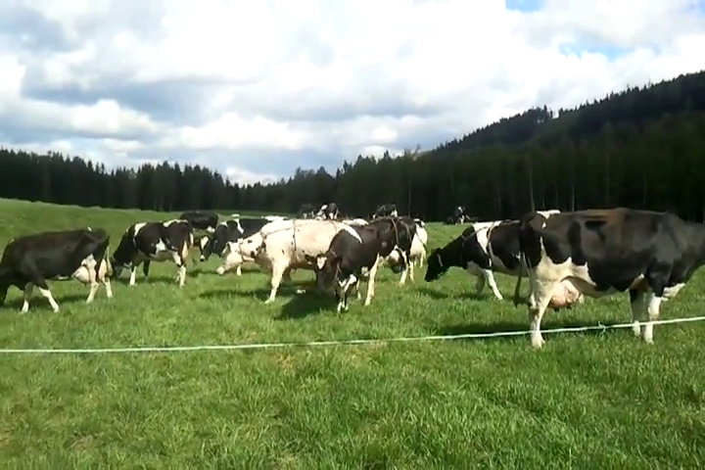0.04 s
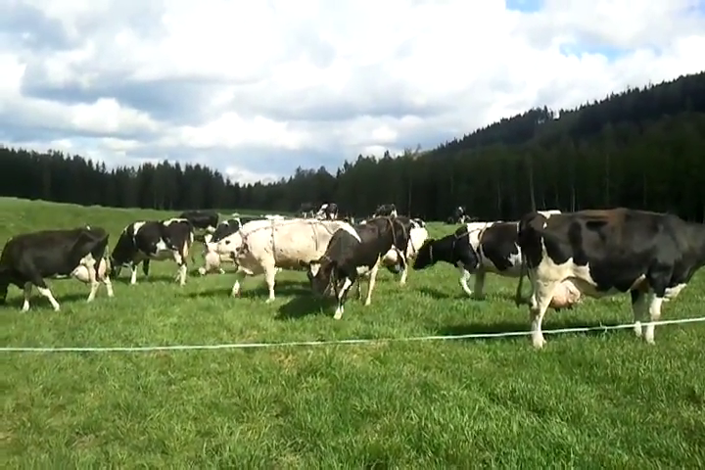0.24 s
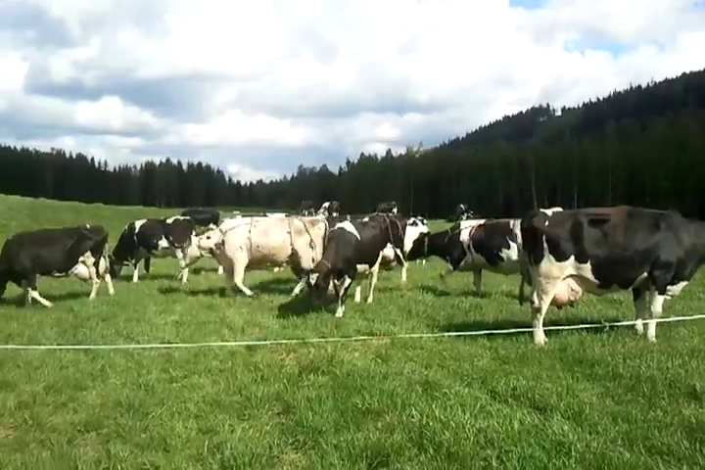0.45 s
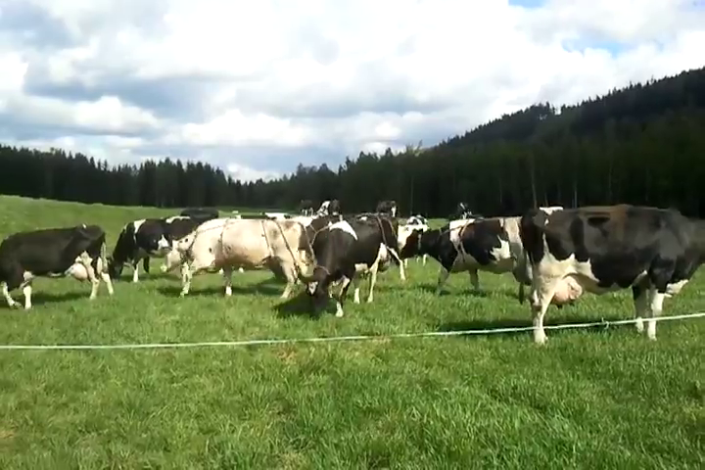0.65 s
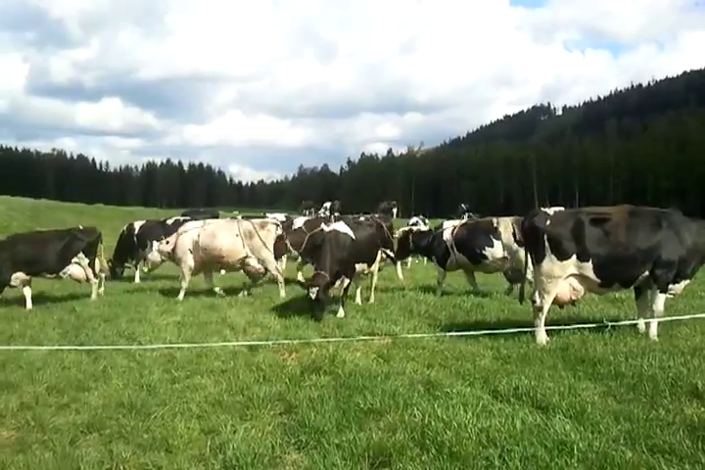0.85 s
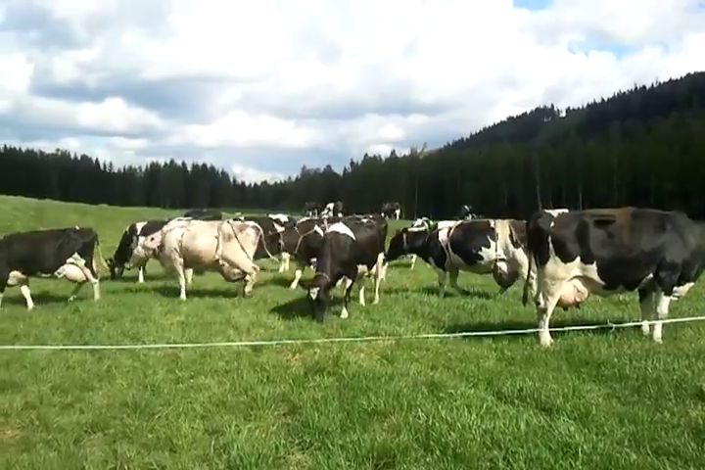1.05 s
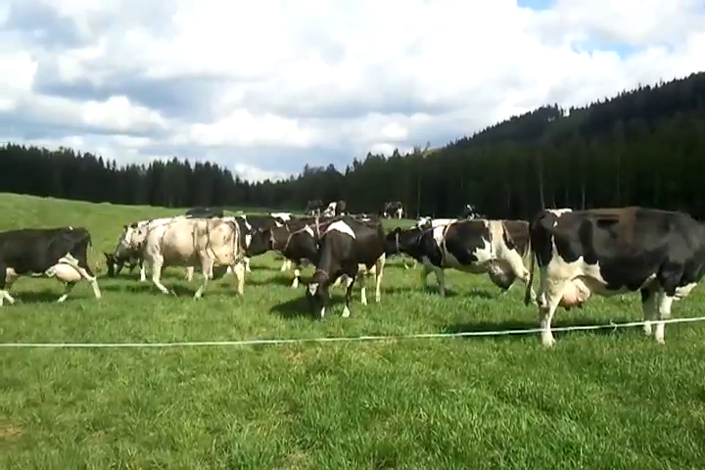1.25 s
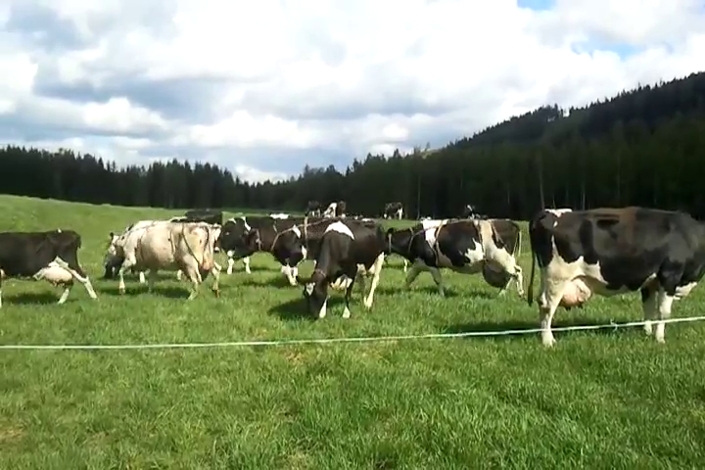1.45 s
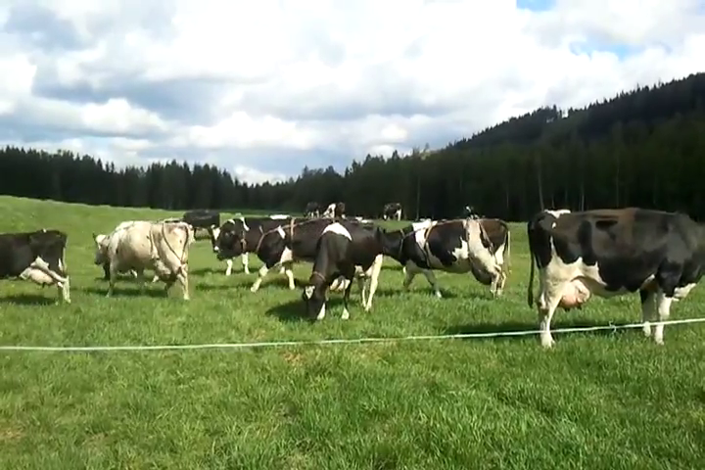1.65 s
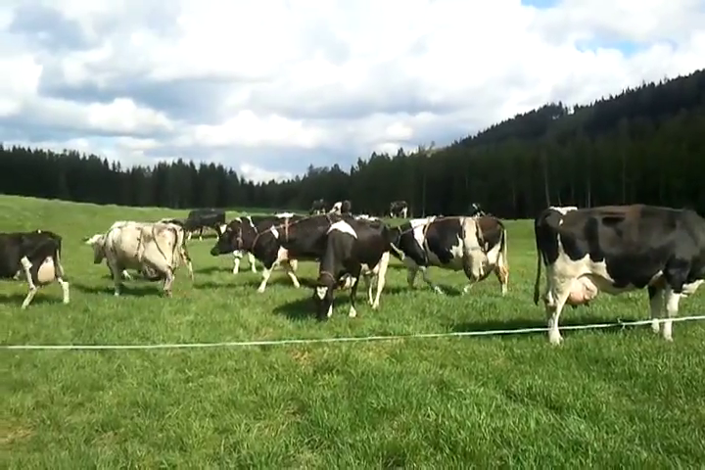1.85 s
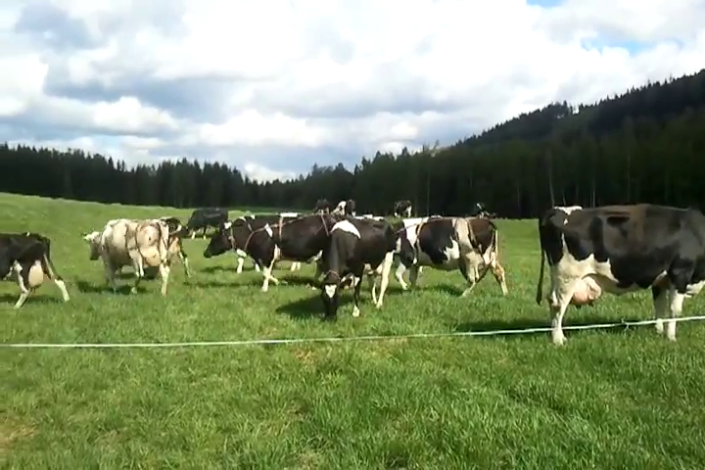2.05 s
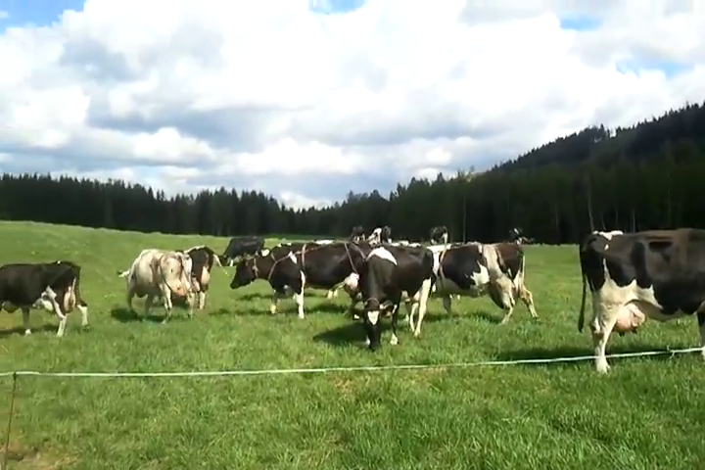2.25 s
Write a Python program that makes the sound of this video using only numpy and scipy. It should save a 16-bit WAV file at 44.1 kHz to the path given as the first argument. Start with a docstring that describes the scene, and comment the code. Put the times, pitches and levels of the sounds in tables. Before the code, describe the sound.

Cow hooves thud dully and irregularly on soft turf, with grass swishing in open air.

```python
"""A herd of cows trots and frisks over an open pasture, some metres away.
Hooves thud dully into the soft turf and crush the soil, and now and then one clicks on something hard.
Legs swish through the grass and snap a few stalks, while the farther animals make a low rumble.
A few thin, high chirps sound over the steady hiss of the open air."""
import sys
import numpy as np
from scipy import signal
from scipy.fft import rfft, irfft
from scipy.io import wavfile
from scipy.ndimage import uniform_filter1d

SR = 44100
rng = np.random.default_rng(int(sys.argv[2]) if len(sys.argv) > 2 else 0)


def wrap_up_sound(samples):
    """Save the sound to the file named by the first command line argument, as 16-bit audio."""
    columns = np.atleast_2d(samples).T
    # keep every value between -1 and 1, then stretch to whole-number steps
    tamed = np.clip(columns, -1, 1)
    steps = np.round(tamed * 32767).astype(np.int16)
    wavfile.write(sys.argv[1], SR, steps)


N = 102135
TIME = np.arange(N) / SR


def from_db(db):
    """Turn decibels into a number to multiply a sound by."""
    return 10 ** (np.asarray(db) / 20)


def unit_power(sound):
    """Scale a sound so that its average power is 1."""
    return sound / np.sqrt(np.mean(sound ** 2) + 1e-20)


def coloured(noise, spectrum):
    """Shape a noise's lows and highs along (Hz, dB) points, then scale it to a power of 1."""
    hz, db = np.transpose(spectrum)
    freqs = np.maximum(np.arange(N // 2 + 1) * SR / N, 1)
    gain = from_db(np.interp(np.log(freqs), np.log(hz), db))
    low_cut = freqs ** 2 / (freqs ** 2 + 10 ** 2)   # fades out below 10 Hz
    return unit_power(irfft(rfft(noise) * gain * low_cut, N))


def band_noise(hz, width, order=2):
    """Make noise around one pitch; width is roughly the band's share of that pitch."""
    edges = np.clip([hz / (1 + width / 2), hz * (1 + width / 2)], 10, SR / 2 - 1)
    band = signal.butter(order, edges, "band", fs=SR, output="sos")
    return unit_power(signal.sosfilt(band, rng.standard_normal(N)))


def cracks(rows, rise_s, decay_s):
    """Make the short bursts of noise of things breaking, each around its own pitch."""
    out = np.zeros(N)
    for start, db, hz, width in rows:
        age = np.maximum(TIME - start, 0)
        envelope = (1 - np.exp(-age / rise_s)) * np.exp(-age / decay_s)
        out += from_db(db) * envelope * band_noise(hz, width, order=4)
    return out


def herd_rumble():
    """The farther animals blur into a low rumble that swells and sinks."""
    # How loud the rumble is. Each row: time in seconds, level in dB.
    levels = [(0, -38.5), (.25, -51.5), (.45, -39), (.7, -42.5), (.88, -34.5), (1.0, -48), (1.2, -33.5),
              (1.6, -37.5), (1.9, -38.5), (2.0, -33), (2.32, -32.5)]
    # The rumble's tone. Each row: frequency in Hz, relative level in dB.
    spectrum = [(20, 8), (35, 4), (60, -0.5), (110, -6.5), (180, -13.5), (300, -28.5), (600, -63.5)]
    loudness = from_db(np.interp(TIME, *np.transpose(levels)))
    return loudness * coloured(rng.standard_normal(N), spectrum)


def open_air():
    """Open air and distant trees make a steady hiss."""
    # The tone of the hiss. Each row: frequency in Hz, relative level in dB.
    spectrum = [(100, 4), (200, -0.5), (330, -3.5), (550, -3.5), (1300, -5.5), (1750, -6.5), (2600, -15),
                (4000, -18), (6600, -14), (8100, -24), (9000, -30.5), (10000, -47)]
    return from_db(-44.5) * coloured(rng.standard_normal(N), spectrum)


def grass_swishes():
    """Blades of grass flick against the legs, and their many tiny ticks merge into swishes."""
    # Legs sweeping the grass. Each row: start in seconds, length in seconds, level in dB.
    swishes = [(0.0, 0.095, -55.5), (0.213, 0.049, -49.5), (0.344, 0.0092, -48), (0.384, 0.028, -46.5),
               (0.422, 0.028, -52), (0.447, 0.044, -49), (0.502, 0.18, -50.5), (0.732, 0.048, -51.5),
               (0.778, 0.018, -45), (0.859, 0.16, -52.5), (1.025, 0.1, -47.5), (1.124, 0.065, -50.5),
               (1.198, 0.057, -42.5), (1.26, 0.17, -49.5), (1.395, 0.09, -46.5), (1.519, 0.16, -50.5),
               (1.693, 0.033, -46.5), (1.725, 0.037, -45), (1.769, .10, -45.3), (1.869, 0.033, -45),
               (1.914, 0.19, -49.5), (2.059, 0.018, -43.5), (2.091, 0.2, -51)]
    # The tone of the grass. Each row: frequency in Hz, relative level in dB.
    spectrum = [(1000, 6.5), (2500, -5), (4000, 3.5), (6500, 5.5), (8000, 4.5), (9000, -9.5), (10000, -36)]
    attack_s, release_s = 0.0042, 0.011
    blades_per_s, flicker_db = 1500, 1.5
    power = np.zeros(N)
    for start, length, db in swishes:
        attack = np.clip((TIME - start) / min(attack_s, length / 2), 0, 1)
        release = np.exp(-np.maximum(TIME - start - length, 0) / release_s)
        power += (from_db(db) * attack * release) ** 2
    # Uneven contact makes the level flicker within a sweep.
    contact = unit_power(uniform_filter1d(rng.standard_normal(N), size=250))
    flicker = from_db(flicker_db * contact)
    ticks = unit_power((rng.random(N) < blades_per_s / SR) * rng.standard_normal(N))
    rustle = ticks + rng.standard_normal(N)   # equal parts ticks and smooth hiss
    return np.sqrt(power) * coloured(flicker * rustle, spectrum)


def hoof_clicks():
    """A hoof knocks on something hard, crunches a little and rings until the turf damps it."""
    # Hard knocks. Each row: start in seconds, level in dB, pitch in Hz, ring length in cycles.
    clicks = [(0.386, -36.5, 1720, 5.5), (0.598, -32.5, 1570, 3.8), (1.0283, -33.5, 1470, 3.1),
              (1.143, -36, 1340, 2.7), (1.1775, -30.5, 900, 1.04), (1.409, -29.5, 1680, 1.8),
              (1.879, -33.5, 930, 3.7), (2.0521, -29.5, 1250, 0.65), (2.0546, -35.5, 1370, 1.6),
              (2.1105, -25.5, 1170, 1.5)]
    crunch_db, crunch_decay_s = -12.5, 0.0034
    out = np.zeros(N)
    for start, db, hz, cycles in clicks:
        age = np.maximum(TIME - start, 0)
        progress = age * hz / cycles
        envelope = np.sqrt(2 * np.e) * progress * np.exp(-progress ** 2)   # peaks at 1
        ring = envelope * np.sin(2 * np.pi * hz * age)
        crunch_fade = (TIME > start) * np.exp(-age / crunch_decay_s)
        crunch = from_db(crunch_db) * crunch_fade * band_noise(hz, width=1.77, order=4)
        out += from_db(db) * (ring + crunch)
    return out


def stalk_snaps():
    """Stalks break with tiny, bright cracks."""
    # Each row: start in seconds, level in dB, pitch in Hz, width as a share of the pitch.
    snaps = [(0.452, -37.5, 5900, .25), (0.473, -35.5, 6300, 0.27), (1.1435, -35, 6900, .4),
             (1.409, -32.5, 2510, 1.53), (1.6645, -31, 6040, 0.6)]
    return cracks(snaps, rise_s=0.00085, decay_s=0.003)


def hoof_thuds():
    """Each landing swells quickly, rocks the turf briefly and crumbles a little soil."""
    # Hoof landings. Each row: time of the peak in seconds, level in dB, pitch in Hz, decay in cycles.
    landings = [(0.491, -27.5, 42.6, 0.29), (0.514, -28, 81.4, 0.47), (0.581, -26.5, 49.6, 1.06),
                (0.636, -13, 67.6, 0.57), (0.653, -14.5, 97, 0.27), (0.67, -22, 58.6, 0.88),
                (0.759, -26.5, 95.6, 0.27), (0.803, -20.5, 55.2, .45), (1.094, -23.5, 79, 0.63),
                (1.110, -24.5, 81.3, 0.3), (1.176, -18, 91, 1.9), (1.197, -25, 60.3, 2.3),
                (1.239, -26, 52, 0.74), (1.347, -18, 104, 0.31), (1.389, -24, 53, 5.3),
                (1.421, -16, 54.6, 0.34), (1.442, -16.5, 50, 1.33), (1.484, -25.5, 89, 2.3),
                (1.563, -24.5, 47.8, 1.5), (1.644, -24.5, 71.4, 0.53), (1.694, -27, 60.5, 0.32),
                (1.781, -22, 102, 0.45), (1.808, -22.5, 35, 0.47), (1.873, -14.5, 46.3, 0.36),
                (1.886, -24, 87.7, 1.5), (1.918, -18, 70, 0.86), (2.045, -28, 40.4, 3.3),
                (2.126, -25.5, 62, 2.2), (2.156, -18, 57, 0.93), (2.189, -16.5, 80, 0.69),
                (2.217, -18, 68, 0.29), (2.242, -18, 66, 0.23), (2.265, -13.5, 71.6, 0.34),
                (2.288, -12.5, 65.3, 0.38), (2.305, -13.5, 98.5, 0.43)]
    rise_cycles = 0.68   # the soft turf gives way before the hoof stops
    overtone_db = -14   # this overtone steepens the front of a thud
    soil_db, soil_hz, soil_decay_s = -35, 240, 0.0072
    turf, crumbling = np.zeros(N), np.zeros(N)
    for peak_s, db, hz, decay_cycles in landings:
        cycles = (TIME - peak_s) * hz
        envelope = np.exp(-(cycles / np.where(cycles < 0, rise_cycles, decay_cycles)) ** 2)
        phase = 2 * np.pi * cycles
        turf += from_db(db) * envelope * (np.cos(phase) - from_db(overtone_db) * np.sin(2 * phase))
        crumbling += from_db(db) * (TIME > peak_s) * np.exp(-np.abs(TIME - peak_s) / soil_decay_s)
    return turf + from_db(soil_db) * crumbling * band_noise(soil_hz, width=1.06)


def chirps():
    """Each thin chirp is two steady high tones that start together and quickly fade."""
    # Each row: start and length in seconds, lower and upper pitch in Hz, level in dB.
    notes = [(1.053, 0.023, 7460, 8500, -42), (1.078, 0.027, 7090, 8800, -37),
             (1.142, 0.0074, 6490, 7900, -38), (1.199, 0.01, 4660, 8000, -48)]
    upper_db, fade_s = -12, 0.038
    out = np.zeros(N)
    for start, length, lower_hz, upper_hz, db in notes:
        age = np.clip(TIME - start, 0, length)
        envelope = np.sqrt(np.abs(np.sin(np.pi * age / length))) * np.exp(-age / fade_s)
        lower = np.sin(2 * np.pi * lower_hz * age)
        upper = from_db(upper_db) * np.sin(2 * np.pi * upper_hz * age)
        out += from_db(db) * envelope * (lower + upper)
    return out


def crushed_clods():
    """Lumps of earth break under a hoof with a low, dull crunch."""
    # Each row: start in seconds, level in dB, pitch in Hz, width as a share of the pitch.
    clods = [(1.338, -35.5, 302, 0.51), (1.434, -35, 242, 0.92), (2.107, -40.5, 540, 1.0)]
    return cracks(clods, rise_s=0.002, decay_s=0.014)


def scene():
    """Mix the near hooves, grass and chirps with the herd's rumble and the air, in one channel."""
    background = herd_rumble() + open_air()
    near_cows = grass_swishes() + hoof_clicks() + stalk_snaps() + hoof_thuds() + crushed_clods()
    return (background + near_cows + chirps())[None]


def record(dry):
    """Gently remove the bass below 4 Hz and steeply cut the treble above 9850 Hz."""
    bass_cut = signal.butter(1, 4, "high", fs=SR, output="sos")
    treble_cut = signal.ellip(10, 0.2, 80, 9850, fs=SR, output="sos")
    return signal.sosfilt(treble_cut, signal.sosfilt(bass_cut, dry))


dry = scene()
out = record(dry)
wrap_up_sound(out)
```